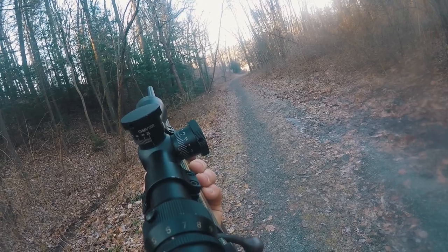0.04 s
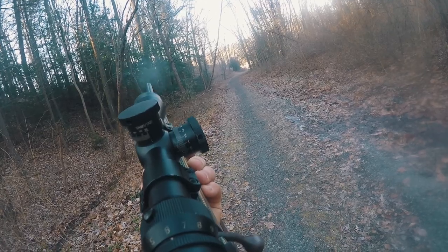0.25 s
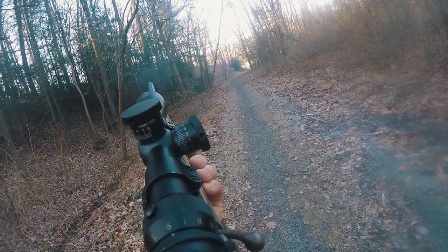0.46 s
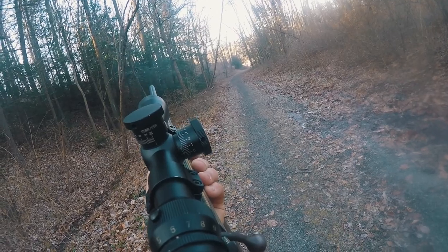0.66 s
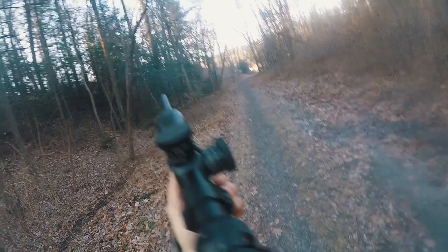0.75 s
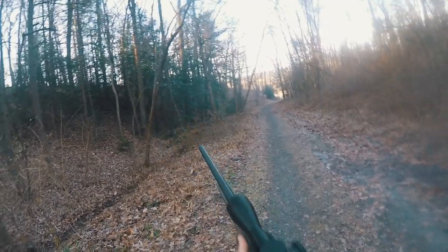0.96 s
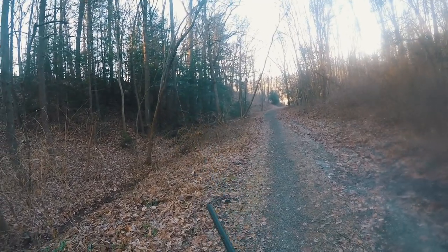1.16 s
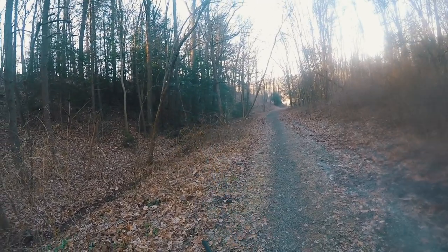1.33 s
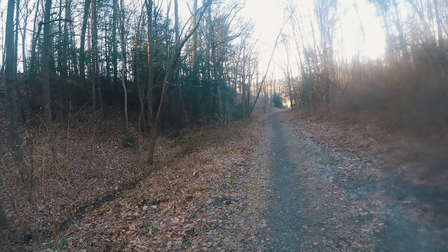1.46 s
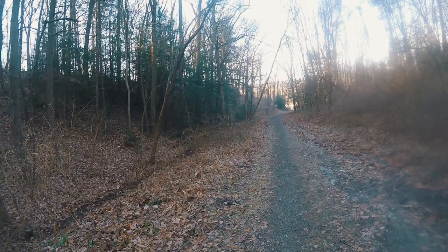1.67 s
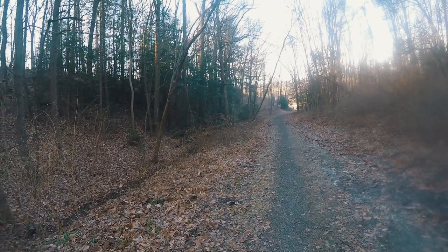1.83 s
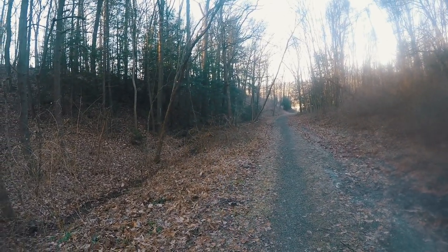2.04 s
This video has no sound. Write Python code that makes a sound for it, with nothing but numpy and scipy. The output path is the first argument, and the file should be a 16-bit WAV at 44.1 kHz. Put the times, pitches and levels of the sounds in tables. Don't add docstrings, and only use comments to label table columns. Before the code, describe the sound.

On an open woodland track, faint wind and leaf hiss precede one violent rifle crack heard from just behind the gun; quick slaps return from trunks, a long tail dulls away, then light handling sounds.

```python
import sys
import numpy as np
from scipy import signal
from scipy.io import wavfile

SR = 44100
rng = np.random.default_rng(int(sys.argv[2]) if len(sys.argv) > 2 else 0)


def wav_record(signal):
    frames = np.transpose(np.atleast_2d(signal))
    bounded = np.clip(frames, -1, 1)
    quanta = np.round(bounded * 32767).astype(np.int16)
    wavfile.write(sys.argv[1], SR, quanta)


def rack_gain(trim_db):
    fader = np.asarray(trim_db, float)
    return 10 ** (fader / 20)


N = 92610

# frequency in Hz, level in dB per Hz.
LEAF_COLOUR = [(150, -4), (300, 4), (1000, -10), (3200, -13), (5000, -16.5), (9000, -23.5), (14500, -24),
               (16000, -32.5)]
# frequency in Hz, level in dB per Hz.
WIND_COLOUR = [(12, 1.5), (25, 4), (45, -1.5), (80, -3.5), (150, -13), (300, -24), (600, -56)]
# time in seconds, level in dB.
GUSTS = [(0, -1.5), (.1, 2.5), (.2, -1), (.5, 10.5), (.9, -1.5), (1.3, 1), (1.45, 1), (1.65, 2), (1.85, -1),
         (1.97, -6), (2.1, -3)]
LEAF_DB, WIND_DB = -66, -50.5

# start in seconds, peak in dB, pitch in Hz, 60 dB decay in seconds.
TICKS = [(.059, -66, 9300, .01), (.135, -66, 1700, .04), (.140, -66, 3900, .012), (.1595, -59, 1700, .03),
         (.159, -64, 4000, .01), (.178, -65, 1750, .05), (1.6915, -48, 900, .015), (2.012, -68, 9000, .01),
         (2.0213, -46, 3900, .012), (2.0215, -62, 8800, .006), (2.0215, -47, 2900, .012),
         (2.0228, -42, 1550, .022), (2.024, -59, 5800, .007), (2.024, -63, 11300, .008),
         (2.0245, -66, 14000, .008), (2.025, -46, 850, .018), (2.0405, -64, 10300, .028),
         (2.085, -56, 1200, .02), (2.095, -58, 2200, .03)]
# start in seconds, peak in dB, pitch in Hz,
# 60 dB decay in seconds.
STEEL = [(.2122, -48.5, 3640, .03), (.2152, -29.5, 6000, .01), (.2156, -26.5, 11000, .006),
         (.2166, -10, 2400, .015), (.2176, -16.5, 4300, .008), (.2183, -2.5, 1500, .004),
         (.2189, -3.5, 4000, .006), (.2192, 11, 1800, 0.0037), (.2195, 12, 4700, .006),
         (.2200, 9.5, 4700, .004), (.2198, -8, 13400, .004), (.2190, -5.5, 8000, .008),
         (.2229, -13, 3012, 0.0066), (.2235, -25.5, 9400, 0.044), (.2245, -23.5, 4000, .04),
         (.2292, -14, 4500, 0.011), (.2335, -10.5, 2500, 0.014), (.238, -19, 4000, 0.0075)]
TICK_ROUGH, STEEL_ROUGH, TRUNK_ROUGH = .55, .4, 1.2

# start in seconds, level in dB, push length in seconds.
BLASTS = [
    (.2205, 17, .0039),
    (.2276, 2, .0008),
    (.2293, -1, .003),
]
REBOUND, REBOUND_S = .088, .016

# start in seconds, peak in dB, pitch in Hz,
# 60 dB decay in seconds.
TRUNKS = [(.2535, -24, 2500, 0.0055), (0.24, -9, 2000, 0.0088), (0.33, -20, 8000, 0.011),
          (.2755, -49, 4500, .006), (.282, -13, 558, 0.07), (.2855, -12, 540, 0.052),
          (.327, -5, 640, 0.014), (0.26, -11, 5500, 0.0092), (.3275, -23, 10000, 0.0051),
          (.337, -26, 9000, 0.0077), (0.27, -8, 4100, 0.013), (0.36, -20.5, 450, 0.12),
          (.355, -18, 480, 0.123), (0.34, -19, 590, .04), (0.31, -17, 700, 0.036), (0.45, -20, 4500, 0.017),
          (0.42, -16.5, 694, 0.056), (.417, -36, 2500, 0.0025), (0.47, -38, 10500, .01),
          (0.8, -37, 1210, 0.013)]
# frequency in Hz, level in dB per Hz.
NEAR_COLOUR = [(30, -8), (100, -4.5), (280, 1.5), (500, -5.5), (1500, -6), (5000, -8.5), (9000, -18),
               (15500, -23)]
# frequency in Hz, 60 dB decay in seconds.
NEAR_T60 = [(60, .25), (300, .6), (1000, 0.83), (4000, 1), (8000, 0.85), (11500, 0.73), (15000, .45)]
# frequency in Hz, level in dB per Hz.
FAR_COLOUR = [(60, -36.5), (150, -23.5), (350, -7.5), (700, -4), (1500, -6), (3000, -1), (6000, -7.5),
              (12000, -26)]
# frequency in Hz, 60 dB decay in seconds.
FAR_T60 = [(100, 2.13), (600, 3.07), (2000, 2.134), (4000, 1.4), (6000, 1.023), (8500, 0.84), (12000, 0.67),
           (15000, .25)]
SHOT_S, NEAR_DB, FAR_DB = .229, -16, -13
NEAR_PATCHY_DB, FAR_PATCHY_DB = 1.6, 0.85
NEAR_RISE_S, FAR_RISE_S = 0.0015, 0.17
FIRST_DB, FIRST_S = 4.5, 0.009
SLOPE_S, SLOPE_WIDTH_S, SLOPE_DB, SLOPE_HZ = 0.824, 0.23, 4, 820

# start in seconds, length in seconds, level in dB.
RUSTLES = [
    (1.671, .02, -62),
    (1.65, .13, -70),
    (1.985, .035, -68),
    (2.019, .012, -66),
    (1.575, .02, -72),
    (1.5, .015, -74),
]
RUSTLE_HZ = 3200

# time in seconds, gain in dB.
GAIN = [(0, 0), (.232, 0.5), (.27, -10), (0.598, -18), (1.0, -11), (1.3, -6.5), (1.6, -2), (2.1, 5)]
CLIP, HARD = .75, 5.0
BLOCK_HZ, CUTOFF_HZ = 5, 15300


def at_hz(points, hz):
    table_hz, values = np.transpose(points)
    return np.interp(np.log(hz), np.log(table_hz), values)


def in_time(rows):
    return np.interp(np.arange(N) / SR, *np.transpose(rows))


def filtered(x, order, hz, kind):
    return signal.sosfilt(signal.butter(order, hz, kind, fs=SR, output="sos"), x)


def drift(rate_hz):
    r = np.exp(-40 * np.pi * rate_hz / SR)
    slow = signal.lfilter([1], [1, -2 * r, r * r], rng.standard_normal(N // 20 + 2002))[2000:]
    return np.interp(np.arange(N) / 20, np.arange(len(slow)), slow / slow.std())


def bands(colour, patchy_db, course_db=lambda hz: 0):
    out, power = 0, 0
    edges_hz = 12 * 2 ** np.arange(0, 10.6, 1 / 4)
    white = rng.standard_normal((2, N + 4000))
    shared = drift(20)
    for k, (low, high) in enumerate(zip(edges_hz, edges_hz[1:])):
        hz = np.sqrt(low * high)
        level_db = at_hz(colour, hz)
        band = filtered(white[k % 2], 3, [low, high], "band")[4000:]
        flicker_db = patchy_db * (.7 * shared + drift(15))
        out = out + band * rack_gain(level_db + course_db(hz) + flicker_db)
        power += rack_gain(2 * level_db) * (high - low) * 2 / SR
    return out / np.sqrt(power)


def leaves():
    return rack_gain(LEAF_DB) * bands(LEAF_COLOUR, .6)


def wind():
    return rack_gain(WIND_DB + in_time(GUSTS)) * bands(WIND_COLOUR, 2.5)


def rings(rows, rough):
    out, t = np.zeros(N + SR), np.arange(2048) / SR
    for start_s, db, hz, t60_s in rows:
        noise = filtered(rng.standard_normal(len(t)), 2, [hz / 1.5, min(hz * 1.5, CUTOFF_HZ)], "band")
        tone = np.sin(2 * np.pi * hz * t) + rough * noise / noise.std()
        attack = np.minimum(t * hz / 2, 1)
        wave = tone * rack_gain(db - 60 * t / t60_s) * attack
        i = int(start_s * SR)
        out[i:i + len(t)] += filtered(wave, 2, hz / 3, "high")
    return out[:N]


def handling():
    return rings(TICKS, TICK_ROUGH)


def steel():
    return rings(STEEL, STEEL_ROUGH)


def blast():
    out, t = np.zeros(N), np.arange(N) / SR
    for start_s, db, push_s in BLASTS:
        u = np.maximum(t - start_s, 0)
        push = np.maximum(1 - u / push_s, 0) ** 1.5
        swing = REBOUND * np.minimum(u / push_s, 1) * np.exp(-(u / REBOUND_S) ** 3.0)
        out -= rack_gain(db) * (t >= start_s) * (push - swing)
    return signal.lfilter([.6], [1, -.4], out)


def trunks():
    return rings(TRUNKS, TRUNK_ROUGH)


def wood():
    t = np.arange(N) / SR
    u = np.maximum(t - SHOT_S, 0)
    first_db = FIRST_DB * np.exp(-u / FIRST_S)
    swell_db = SLOPE_DB * np.exp(-((t - SLOPE_S) / SLOPE_WIDTH_S) ** 2)

    def near_course_db(hz):
        return first_db - 60 * u / at_hz(NEAR_T60, hz)

    def far_course_db(hz):
        return swell_db / (1 + (hz / SLOPE_HZ / 3) ** 2) - 60 * u / at_hz(FAR_T60, hz)

    near = rack_gain(NEAR_DB) * bands(NEAR_COLOUR, NEAR_PATCHY_DB, near_course_db)
    far = rack_gain(FAR_DB) * bands(FAR_COLOUR, FAR_PATCHY_DB, far_course_db)
    return np.clip(u / NEAR_RISE_S, 0, 1) * near + np.clip(u / FAR_RISE_S, 0, 1) * far


def rustles():
    t, envelope = np.arange(N) / SR, np.zeros(N)
    for start_s, length_s, db in RUSTLES:
        phase = np.clip((t - start_s) / length_s, 0, 1)
        envelope += rack_gain(db) * np.sqrt(np.abs(np.sin(np.pi * phase)))
    noise = filtered(rng.standard_normal(N), 2, [RUSTLE_HZ / 2, RUSTLE_HZ * 2], "band")
    grain = rack_gain(2.5 * drift(300))
    return envelope * noise / noise.std() * grain


def scene():
    shot = blast() + steel() + trunks() + wood()
    calm = leaves() + wind()
    return (shot + handling() + rustles() + calm)[None]


def band_limit(x):
    return signal.sosfilt(signal.butter(12, 16620, fs=SR, output="sos"), x)


def record(dry):
    x = dry * rack_gain(in_time(GAIN))
    x = x / (1 + np.abs(x / CLIP) ** HARD) ** (1 / HARD)
    x = filtered(x, 1, BLOCK_HZ, "high")
    x = signal.sosfilt(signal.cheby1(8, .2, CUTOFF_HZ, fs=SR, output="sos"), x)
    return band_limit(x)


dry = scene()
out = record(dry)
wav_record(out)
```